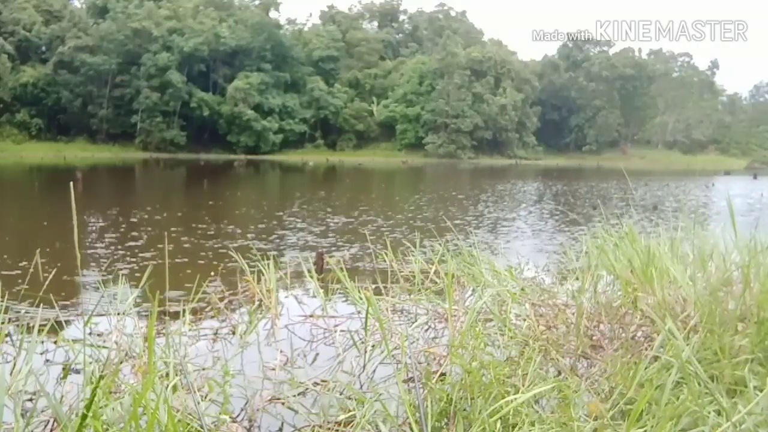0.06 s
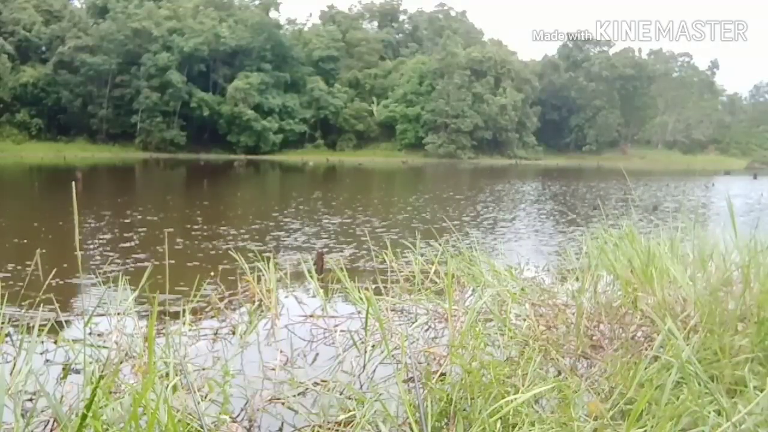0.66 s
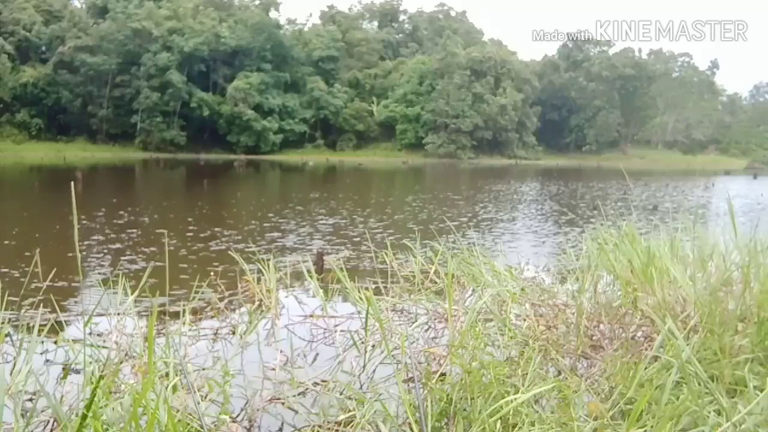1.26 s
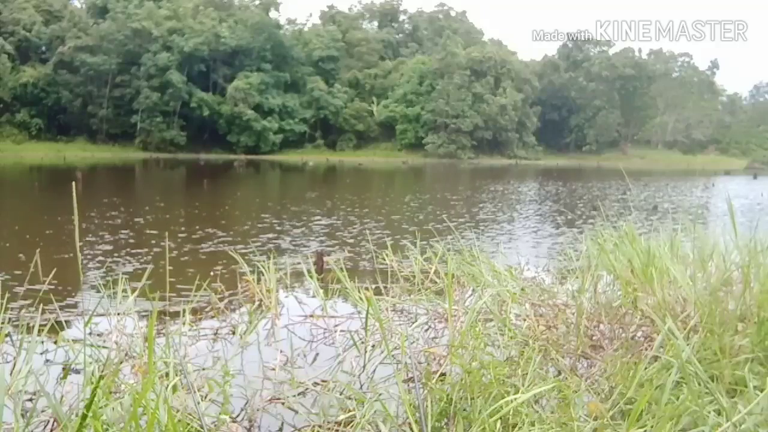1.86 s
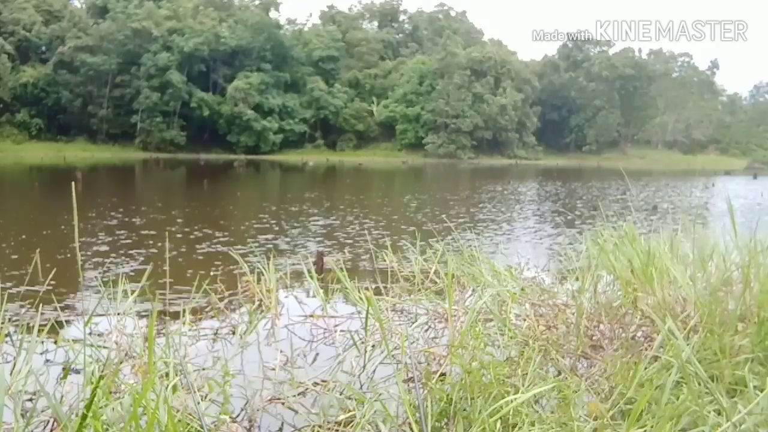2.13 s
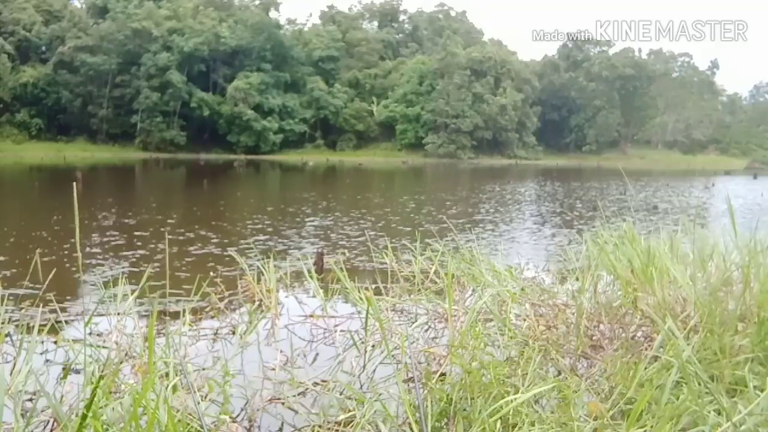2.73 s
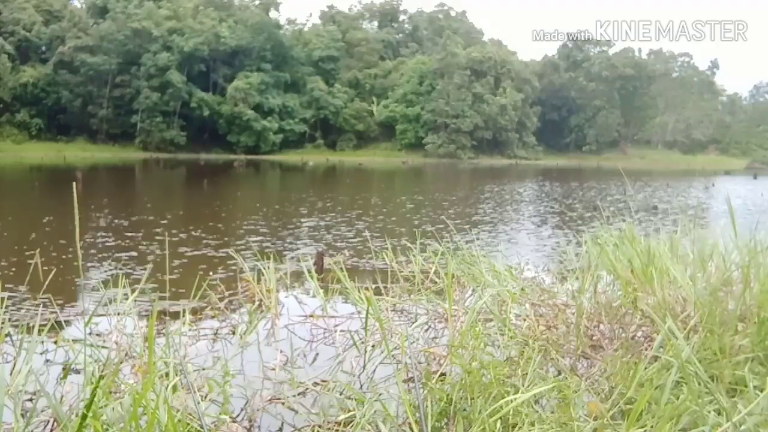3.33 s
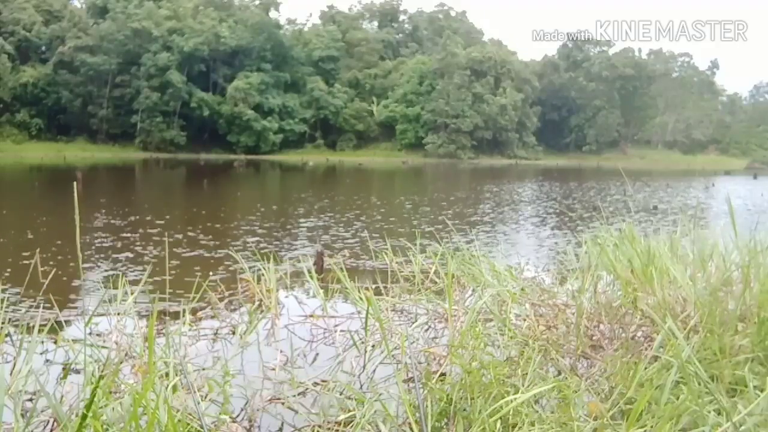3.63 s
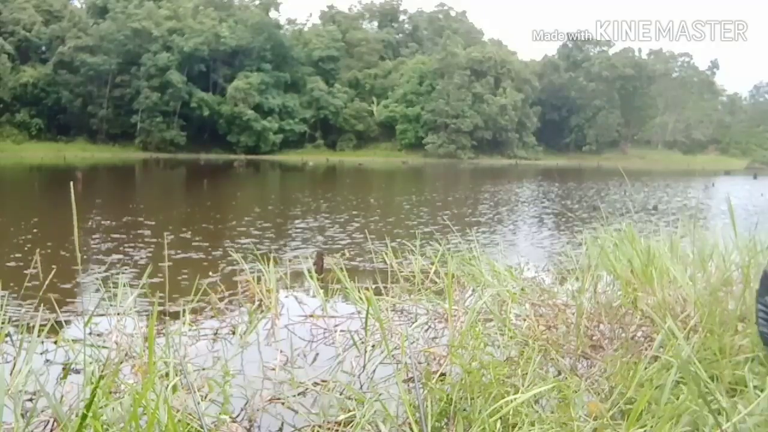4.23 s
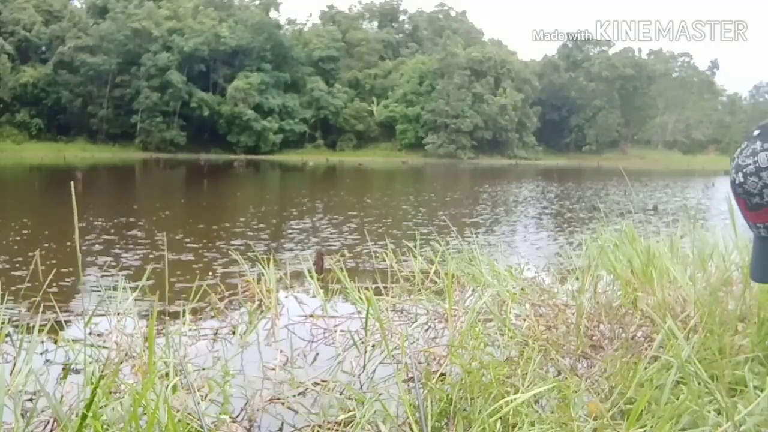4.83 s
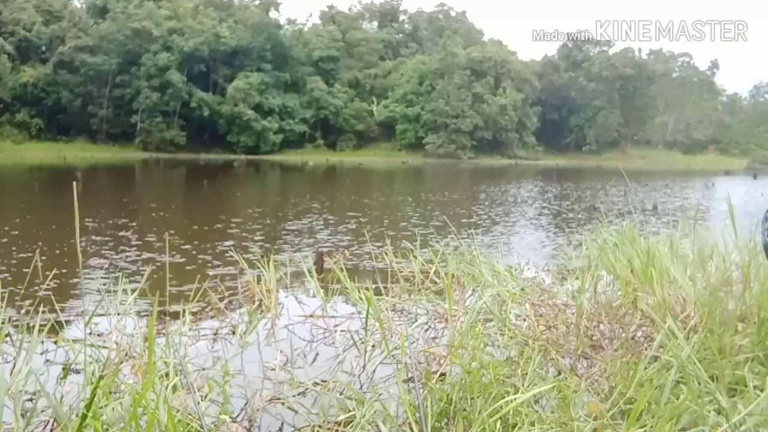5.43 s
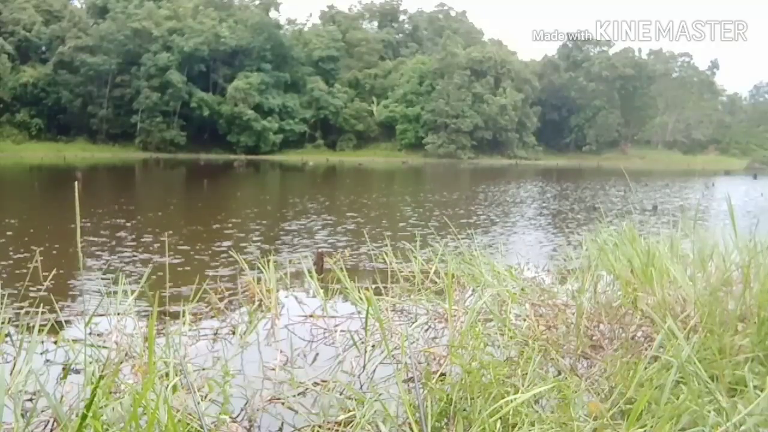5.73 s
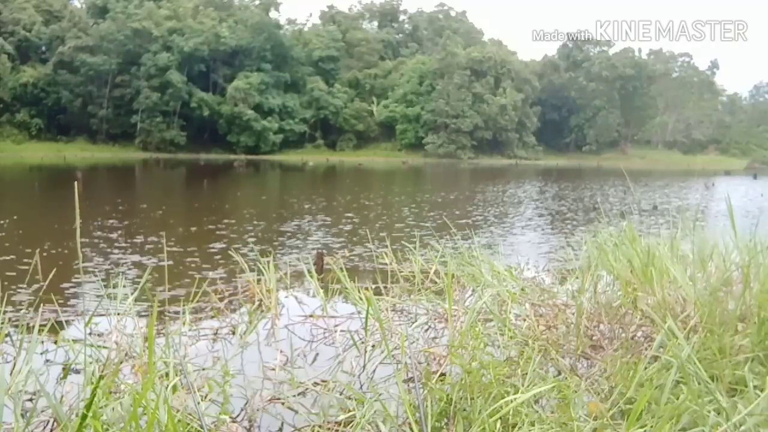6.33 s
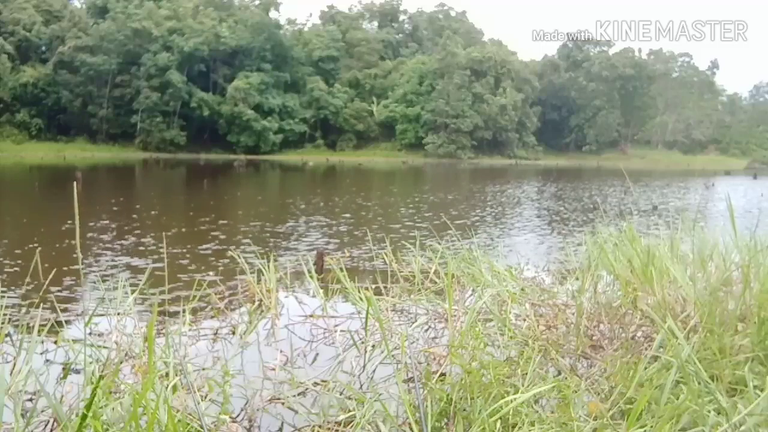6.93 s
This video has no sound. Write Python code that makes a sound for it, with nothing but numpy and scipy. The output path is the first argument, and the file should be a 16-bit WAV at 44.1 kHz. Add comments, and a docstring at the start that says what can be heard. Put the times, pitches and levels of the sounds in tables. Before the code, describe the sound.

A very high insect chirps steadily over a far chorus and birds, while a few steps swish and snap through tall grass midway.

```python
"""A close katydid chirps very high, file on scraper, over a far insect chorus and a light breeze.
Birds whistle, chatter and scold in the trees of a swamp; one pipes a run of rising notes near the end.
Midway someone takes a few steps through tall grass on the bank: blades rub and swish, litter crunches,
stalks snap, feet thud on soft ground. A few small hollow knocks sound nearby. Almost mono."""
import sys
import numpy as np
from scipy import signal
from scipy.fft import rfft, irfft
from scipy.io import wavfile
from scipy.ndimage import uniform_filter1d

SR = 44100
rng = np.random.default_rng(int(sys.argv[2]) if len(sys.argv) > 2 else 0)


def wav_out(sig):
    """Save sig, one row per channel (or a flat mono array), as 16-bit PCM at SR to the path in sys.argv[1]."""
    wavfile.write(sys.argv[1], SR, np.round(np.clip(np.atleast_2d(sig).T, -1, 1) * 32767).astype(np.int16))


N = 312669
TIME_S = np.arange(N) / SR
FREQ_HZ = np.fft.rfftfreq(N, 1 / SR)

# All table levels are relative.
# near katydid chirps: t/s, length/s
KATYDID_CHIRPS = [(-.02, 0.11), (0.238, .11), (0.591, 0.12), (0.875, .11), (1.201, 0.1), (1.578, 0.1),
                  (1.904, 0.11), (2.16, 0.12), (2.437, 0.076), (2.656, .1), (2.863, 0.11), (3.105, 0.13),
                  (3.342, 0.12), (3.646, 0.12), (3.885, 0.12), (4.162, .1), (4.382, 0.083), (4.592, 0.13),
                  (4.841, 0.14), (5.198, 0.11), (5.449, .11), (5.686, 0.12), (5.938, 0.11), (6.172, 0.12),
                  (6.423, 0.15), (6.678, 0.15), (6.954, .14)]
# wing resonance: f/Hz, level/dB
WING_SPECTRUM = [(8000, -29.5), (13000, -23.5), (14100, -32), (14550, 4), (15000, -5), (15400, 11),
                 (16000, -29)]
# breeze rumble: f/Hz, level/dB
RUMBLE_SPECTRUM = [(20, -47), (45, -13), (85, -1), (140, -1.5), (250, -14.5), (600, -33)]
# open-air hiss: f/Hz, level/dB
HISS_SPECTRUM = [(60, -18.5), (220, 1.5), (500, -1.5), (1050, -4.5), (1250, -1.5), (1550, -8.5), (2700, -5),
                 (3500, -3), (5700, -4.5), (10500, -13.5), (15500, -19.5)]
# far insect kinds: f/Hz, half bandwidth/Hz, level/dB, pulse rate/Hz
INSECT_BANDS = [(6315, 140, -73.5, 45), (6978, 290, -66, 23), (7510, 370, -67, 24), (8400, 990, -74.5, 6.4),
                (9250, 400, -75, 19)]
# slurred bird whistles: t/s, length/s, f/Hz, slur/oct, level/dB
WHISTLE_NOTES = [(-.01, 0.049, 3520, 0.0088, -59.5), (1.54, 0.03, 5640, -.14, -62),
                 (1.654, .11, 5250, .04, -58), (2.186, 0.044, 2040, -0.32, -65),
                 (2.289, 0.037, 5150, -0.28, -60), (4.58, 0.092, 1935, 0.35, -67),
                 (4.604, 0.035, 5590, -0.43, -58.5), (4.661, 0.052, 1427, 0.51, -69),
                 (4.78, .04, 4300, 0.0067, -62), (4.803, 0.068, 1460, -0.78, -69),
                 (5.413, 0.075, 4700, -0.015, -67.5), (5.49, .038, 1880, 0.19, -66),
                 (5.555, 0.061, 1384, 0.69, -69), (5.697, .13, 5080, -0.16, -69),
                 (5.805, 0.039, 1780, -0.41, -64), (5.844, .05, 4300, .05, -71),
                 (5.943, .044, 1465, -0.39, -67.5), (5.998, 0.056, 1810, -0.304, -62.5),
                 (6.202, 0.0565, 1700, .38, -63.5), (6.264, 0.032, 2256, -0.016, -64.5),
                 (6.465, .083, 1856, -0.14, -64.5), (6.538, 0.06, 1424, 0.68, -69.5),
                 (6.805, 0.035, 3040, 0.31, -62.5), (6.818, 0.047, 1480, -0.75, -65),
                 (6.872, 0.056, 5000, 0.018, -69), (7.01, 0.038, 1795, -0.35, -67)]
# far bird chatter: start/s, end/s, low f/Hz, high f/Hz, level/dB
FAR_FLOCKS = [(0, 2.7, 4200, 5900, -74), (0, 2.3, 1600, 2400, -85.5), (3.602, 5.6, 1455, 2450, -72.5),
              (4.398, 8.1, 3100, 6600, -84)]
# harsh bird notes: t/s, length/s, low f/Hz, level/dB
SCOLD_NOTES = [(0.092, 0.12, 3966, -57.5), (0.306, 0.095, 3850, -56.5), (.522, 0.12, 3570, -59),
               (0.731, 0.084, 3505, -56.5), (0.959, .1, 3140, -57.5), (1.166, .11, 3120, -57),
               (1.355, 0.14, 3130, -58), (1.626, 0.12, 2903, -62.5), (1.867, .082, 2967, -59.5),
               (2.076, .078, 3150, -59), (2.331, .065, 2690, -64.5), (2.556, 0.035, 2560, -69)]
# hollow knocks: t/s, peak level/dB, pitch ratio
KNOCK_HITS = [(.7395, -40.5, 1.06), (1.665, -58.5, 0.75), (1.869, -57.5, 1), (2.69, -36, 1.08),
              (3.15, -33.5, 0.87), (3.277, -46.5, 1), (3.451, -35.5, 1.12), (6.308, -55, 0.69),
              (6.414, -54.5, .66)]
# knock modes at pitch ratio 1: f/Hz, level/dB, t60/s
KNOCK_MODES = [(730, -9, 0.058), (810, 1.5, 0.055), (1000, 1.5, 0.064), (1231, 11.5, 0.038),
               (1330, 3.5, 0.028), (2165, -3.5, 0.096)]
# breaking stalks: t/s, peak level/dB, f/Hz, width/oct
STALK_SNAPS = [(1.872, -53, 8400, 0.16), (2.691, -37, 5440, .62), (2.862, -32, 6000, .55),
               (3.506, -27, 5760, .37), (3.519, -19, 6300, 0.5), (3.186, -35, 6500, .5),
               (3.9441, -26.5, 5460, 0.9), (3.967, -29, 7100, 0.16), (4.062, -27, 6840, 0.29),
               (4.124, -29, 7500, 0.25), (4.298, -31, 5100, 0.22), (5.2545, -21, 4470, 0.7),
               (5.372, -43, 4950, 0.3), (6.093, -47, 8680, 0.2)]
# footfalls and weight shifts: full-weight t/s, blade level/dB, litter level/dB, blade fade/(dB/s)
FOOTFALLS = [(2.689, -37.5, -45.5, 97), (2.935, -43, -51.5, 108), (3.15, -40.5, -48.5, 77),
             (3.503, -36.5, -43, 114), (3.65, -48.5, -61, 141), (3.946, -39.5, -44.5, 233),
             (4.058, -44, -50.5, 78), (4.36, -39, -51, 202)]
# legs sweeping the blades: t/s, hold/s, level/dB
LEG_SWEEPS = [(2.861, 0.023, -44), (3.012, 0.037, -51.5), (3.368, 0.09, -54), (3.78, 0.14, -51.5),
              (4.197, 0.22, -54), (4.863, .13, -54), (5.001, .3, -47)]
# rubbing blades: f/Hz, level/dB
BLADE_SPECTRUM = [(700, -26), (1250, -15), (1800, -15.5), (2600, -15), (3400, -10), (4700, -9.5),
                  (6050, -7.5), (6550, -8.5), (7050, -4), (7700, 0), (8700, -10), (10500, -10.5),
                  (13000, -14), (15500, -4.5)]
# crushed litter: f/Hz, level/dB
LITTER_SPECTRUM = [(50, -52), (110, -5.5), (200, -4), (400, -2.5), (650, -1), (900, 0), (1080, -2),
                   (1280, 1), (1650, -5), (3000, -3.5), (7000, -19.5)]
# feet on soft ground: t/s, level/dB, f/Hz, t60/s
GROUND_THUDS = [(2.727, -38, 163, 0.047), (3.14, -55, 143, 0.089), (3.5, -41, 130, 0.048),
                (3.505, -56, 243, .21), (3.52, -42.5, 152, .076), (3.929, -48, 219, 0.17),
                (4.196, -57, 126, 0.15), (4.273, -53, 103, 0.2), (4.539, -54, 83, .065),
                (4.973, -55, 91, 0.062), (6.056, -44.5, 98, 0.071)]
# piping bird, note by note: level/dB
PIPE_LEVELS_DB = [-58.5, -60, -59, -65, -66.5, -64, -61.5, -62, -71]
# stereo side relative to mid: f/Hz, level/dB
SIDE_SPECTRUM = [(30, -17), (100, -19), (300, -18), (1200, -21), (2500, -27), (4500, -39), (6500, -50),
                 (11000, -48), (15000, -28)]
# housing resonances: f/Hz, width/Hz, gain/dB
HOUSING_MODES = [(241, 18, -1), (409, 17, 2.5), (872, 24, 1.5), (1236, 38, 9), (3810, 100, 3),
                 (4602, 45, 8), (5040, 17, 7.5), (5350, 18, 3), (5610, 82, 3), (5940, 110, 7.5),
                 (7110, 200, 4), (7500, 69, 3.5)]


def amp(db):
    """Decibels to gain."""
    return 10 ** (np.asarray(db) / 20)


def unit_rms(x):
    """Scale to rms 1."""
    return x / np.sqrt(np.mean(x ** 2) + 1e-20)


def colour(x, spectrum):
    """Filter by (f/Hz, level/dB) points."""
    hz, db = np.transpose(spectrum)
    return irfft(rfft(x) * amp(np.interp(np.log(FREQ_HZ + 1), np.log(hz), db)), N)


def wander(rate_hz, size=N):
    """Slow random curve, about unit spread."""
    knots = rng.standard_normal(4096)
    return 1.2 * np.interp(np.arange(size) * rate_hz / SR, np.arange(len(knots)), knots)


def add(mix, at_s, sound):
    """Mix a sound in, cropped to fit."""
    start = round(at_s * SR)
    sound = sound[max(-start, 0):]
    part = mix[max(start, 0):][:len(sound)]
    part += sound[:len(part)]


def clicks(rate_hz, spread_db):
    """Random impulses of uneven size."""
    size = amp(spread_db * np.minimum(rng.exponential(1, N), 4))
    return unit_rms(size * rng.choice([-1., 1.], N) * (rng.random(N) < rate_hz / SR))


def foliage_echo(x, t60_s, wet_db):
    """Direct sound plus diffuse scatter from leaves and stems."""
    t = TIME_S[:SR]
    tail = rng.standard_normal(SR) * amp(-60 * t / t60_s) * (1 - np.exp(-t / 0.00077))
    return x + amp(wet_db) * signal.fftconvolve(x, tail / np.linalg.norm(tail))[:N]


def wing_force(length_s, stroke_hz=36, floor=0.5, onset_db=-5):
    """One chirp of several wing strokes, the first weakest."""
    t = TIME_S[:int(length_s * SR)]
    strokes = floor + np.sin(np.pi * stroke_hz * t) ** 2
    warm_up = amp(onset_db * np.exp(-t * stroke_hz))
    return unit_rms(strokes * warm_up * signal.windows.tukey(len(t), .3))


def katydids(near_db=-52.5, far_db=-80, far_period_s=.29, far_count=25):
    """A file drags over a scraper; tooth clicks ring the wing. A far katydid keeps its own loose pace."""
    force = np.zeros(N)
    for at_s, length_s in KATYDID_CHIRPS:
        add(force, at_s, amp(near_db) * wing_force(length_s))
    for k, lag in enumerate(rng.random(far_count)):
        add(force, (k + lag / 2) * far_period_s, amp(far_db) * wing_force(length_s=0.11))
    teeth = unit_rms(colour(clicks(rate_hz=7000, spread_db=1.5), WING_SPECTRUM))
    return foliage_echo(force * teeth, t60_s=0.16, wet_db=-9)


def breeze(rumble_db=-76, growth_db_per_s=0.26, hiss_db=-72, swell_db=1.75):
    """Slowly freshening wind rumble and faint open-air hiss."""
    rumble = unit_rms(colour(rng.standard_normal(N), RUMBLE_SPECTRUM))
    hiss_gain = amp(hiss_db + swell_db * wander(7.9))
    hiss = unit_rms(colour(rng.standard_normal(N), HISS_SPECTRUM))
    return amp(rumble_db + growth_db_per_s * TIME_S) * rumble + hiss_gain * hiss


def insect_chorus(pulse_depth=0.21, flutter_db=0.73):
    """Far insects of each kind blur into one pulsing band."""
    out = np.zeros(N)
    for hz, half_width_hz, db, pulse_hz in INSECT_BANDS:
        band = irfft(rfft(rng.standard_normal(N)) / (1 + ((FREQ_HZ - hz) / half_width_hz) ** 6), N)
        pulse = np.sin(2 * np.pi * np.cumsum(pulse_hz * (1 + 0.27 * wander(8))) / SR)
        out += amp(db + flutter_db * wander(30)) * unit_rms(band) * (1 + pulse_depth * pulse)
    return out


def flicker(x, depth_db):
    """Narrow bands swell and fade at random, a few hundredths of a second each."""
    frames = signal.stft(x, nperseg=512)[2]
    patches = uniform_filter1d(rng.standard_normal(frames.shape), size=4, axis=1)
    patches = unit_rms(uniform_filter1d(patches, size=2, axis=0))
    return signal.istft(frames * unit_rms(amp(depth_db * patches)), nperseg=512)[1][:N]


def glide(length_s, path_hz, roughness, turn=0.499):
    """Phase and envelope of a bird note: starts clean, roughens as it bends through three pitches."""
    progress = np.linspace(0, 1, int(length_s * SR))
    hz = np.interp(progress, [0, turn, 1], path_hz)
    jitter = roughness * np.minimum(2 * progress, 1) * wander(900, len(hz))
    return 2 * np.pi * np.cumsum(hz * (1 + jitter)) / SR, signal.windows.tukey(len(hz), .4)


def whistle(length_s, path_hz, roughness, waver_db=2.5):
    """One gliding note of wavering level."""
    phase, envelope = glide(length_s, path_hz, roughness)
    return envelope * unit_rms(amp(waver_db * wander(144, len(phase)))) * np.sin(phase)


def whistling_birds(gain_db=-1.5):
    """Up- and downslurs from across the water, echoed by the trees."""
    out = np.zeros(N)
    for at_s, length_s, hz, slur_oct, db in WHISTLE_NOTES:
        path_hz = hz * 2 ** (slur_oct * np.array([-.5, 0, .5]))
        add(out, at_s, amp(db + gain_db) * whistle(length_s, path_hz, roughness=.032))
    return foliage_echo(out, t60_s=.5, wet_db=-.5)


def far_birds(count=50):
    """Short random slurs deep in the trees blend into soft chatter."""
    out = np.zeros(N)
    for start_s, end_s, low_hz, high_hz, db in FAR_FLOCKS:
        for k, (lag, pitch, bend, length, size) in enumerate(rng.random((count, 5))):
            hz = low_hz * (high_hz / low_hz) ** pitch
            slur = 0.249 * (bend - .5)
            path_hz = hz * (1 - slur), hz, hz * (1 + slur)
            phase, envelope = glide(.02 + .03 * length, path_hz, roughness=.04)
            at_s = start_s + (end_s - start_s) * (k + lag) / count
            add(out, at_s, amp(db) * (.5 + size) * envelope * np.sin(phase))
    return foliage_echo(out, t60_s=.6, wet_db=3)


def scolding_bird(gain_db=-0.4, turn_s=.03, dive_from_s=1.5, dive_hz=4200, upper_db=-8, upper_ratio=1.47):
    """Rasping, swelling upslurs with a weaker upper voice; later notes dive in first and are rougher."""
    out = np.zeros(N)
    for at_s, length_s, low_hz, db in SCOLD_NOTES:
        start_hz = dive_hz if at_s > dive_from_s else low_hz
        end_hz = low_hz + .66 * (4850 - low_hz)  # two thirds of the way to 4850 Hz
        roughness = 0.031 + 0.015 * at_s
        turn = min(turn_s / length_s, 1)
        phase, envelope = glide(length_s, (start_hz, low_hz, end_hz), roughness, turn)
        upper_hz = upper_ratio * start_hz, upper_ratio * low_hz, 1.16 * end_hz
        upper_phase, _ = glide(length_s, upper_hz, roughness, turn)
        voices = np.sin(phase) + amp(upper_db) * np.sin(upper_phase)
        swell_db = np.linspace(-5, 0, len(phase))
        rasp = unit_rms(amp(3 * wander(260, len(phase)) + swell_db))
        add(out, at_s, amp(db + gain_db) * envelope * rasp * voices)
    return foliage_echo(out, t60_s=.42, wet_db=0)


def knocks():
    """Light taps ring short, hollow modes."""
    out, t = np.zeros(N), TIME_S[:SR // 5]
    for at_s, db, ratio in KNOCK_HITS:
        ring = sum(amp(mode_db - 60 * t / t60_s) * np.sin(2 * np.pi * hz * ratio * t)
                   for hz, mode_db, t60_s in KNOCK_MODES)
        add(out, at_s, amp(db) * ring / abs(ring).max())
    return out


def crack(centre_hz, width_oct, t60_s, highpass_hz=1300):
    """Millisecond burst pitched by stalk thickness; it carries no bass."""
    t = TIME_S[:4096]
    hz = np.fft.rfftfreq(len(t), 1 / SR) + 1
    resonance = 1 / (1 + (np.log2(hz / centre_hz) / width_oct) ** 2 / 2) ** 2
    burst = irfft(resonance * np.exp(2j * np.pi * rng.random(len(hz)))) * amp(-60 * t / t60_s)
    burst = signal.sosfilt(signal.butter(3, highpass_hz, "high", fs=SR, output="sos"), burst)
    return burst / abs(burst).max()


def stalk_snaps(splinter_at_s=4.353, splinter_length_s=.035, fibres=7, fibre_db=-25, spread_db=2):
    """Most stalks break in one crack; a tough one splinters fibre by fibre."""
    out = np.zeros(N)
    for at_s, db, centre_hz, width_oct in STALK_SNAPS:
        add(out, at_s, amp(db) * crack(centre_hz, width_oct, t60_s=0.021))
    for k, (lag, size) in enumerate(rng.random((fibres, 2))):
        gain = amp(fibre_db + spread_db * (2 * size - 1))
        at_s = splinter_at_s + splinter_length_s * (k + lag) / fibres
        add(out, at_s, gain * crack(centre_hz=5280, width_oct=0.19, t60_s=0.0039))
    return foliage_echo(out, t60_s=.08, wet_db=-12)


def push(at_s, hold_s, rise_s, fade_db_per_s):
    """Load on the grass: builds until at_s, holds, fades."""
    build = np.exp(np.minimum(TIME_S - at_s, 0) / rise_s)
    return build * amp(-fade_db_per_s * np.maximum(TIME_S - at_s - hold_s, 0))


def footfall(at_s, fade_db_per_s, heel_lead_s=0.037, heel_db=-9.5, rise_s=0.013):
    """Light heel contact, then full weight."""
    heel = amp(heel_db) * push(at_s - heel_lead_s, 0, rise_s, fade_db_per_s)
    return np.maximum(heel, push(at_s, 0, rise_s, fade_db_per_s))


def walk(sweep_litter_db=-22.5, litter_fade_ratio=1.12):
    """Blade and litter envelopes; leg sweeps and footfalls add in power."""
    brush_power = sum((amp(db) * push(at_s, hold_s, rise_s=0.014, fade_db_per_s=101)) ** 2
                      for at_s, hold_s, db in LEG_SWEEPS)
    crush_power = brush_power * amp(sweep_litter_db) ** 2
    for at_s, blade_db, litter_db, fade_db_per_s in FOOTFALLS:
        brush_power += (amp(blade_db) * footfall(at_s, fade_db_per_s)) ** 2
        crush_power += (amp(litter_db) * footfall(at_s, fade_db_per_s * litter_fade_ratio)) ** 2
    return np.sqrt(brush_power), np.sqrt(crush_power)


def blade_ring(drive, low_hz=1200, high_hz=10000, width_hz=220, rub_db=3.5, count=44):
    """Each click rings one blade; each blade has its own pitch and moments of rubbing."""
    out, blade = np.zeros(N), rng.integers(0, count, N)
    radius = np.exp(-np.pi * width_hz / SR)
    for k, hz in enumerate(np.linspace(low_hz, high_hz, count)):
        rubbing = amp(rub_db * wander(55))
        resonator = [1, -2 * radius * np.cos(2 * np.pi * hz / SR), radius ** 2]
        out += signal.lfilter([1, 0, -1], resonator, drive * rubbing * (blade == k))
    return unit_rms(out)


def grass(clump_db=1.05, firm_db=-44, tick_db=-10):
    """Blades slip in clumps of fine clicks and dry ticks; litter breaks in coarser, duller ones."""
    clumps = amp(clump_db * wander(170))
    brush, crush = walk()
    ringing = blade_ring(clicks(rate_hz=9000, spread_db=3.5))
    scrape = (brush / amp(firm_db)) ** 0.3  # firmer push, brighter scrape
    rubbed = (ringing + scrape * clicks(rate_hz=3000, spread_db=2)) / np.sqrt(1 + scrape ** 2 / 2)
    ticks = amp(tick_db) * clicks(rate_hz=130, spread_db=2.5)
    swish = unit_rms(colour(clumps * (rubbed + ticks), BLADE_SPECTRUM))
    crunch = unit_rms(colour(clumps * clicks(rate_hz=2000, spread_db=1), LITTER_SPECTRUM))
    return swish * brush + crunch * crush


def thuds(rise_s=0.0032, highpass_hz=65):
    """A foot's weight gives soft ground a dull, uneven push."""
    out, t = np.zeros(N), TIME_S[:SR // 4]
    for at_s, db, hz, t60_s in GROUND_THUDS:
        phase = 2 * np.pi * np.cumsum(hz * (1 + 0.2 * wander(153, len(t)))) / SR
        envelope = amp(db - 60 * t / t60_s) * (1 - np.exp(-t / rise_s))
        add(out, at_s, envelope * np.sin(phase))
    return signal.sosfilt(signal.butter(4, highpass_hz, "high", fs=SR, output="sos"), out)


def piping_bird(start_s=5.468, period_s=.1465, length_s=0.077, path_hz=(3200, 3370, 3680), fade_db=-9):
    """One short upslur repeated at an even pace, each note fading as it rises."""
    out = np.zeros(N)
    for k, db in enumerate(PIPE_LEVELS_DB):
        detune = 1 + 0.0248 * rng.uniform(-1.01, 1)
        note = whistle(length_s, np.array(path_hz) * detune, roughness=0.041)
        add(out, start_s + k * period_s, amp(db + np.linspace(0, fade_db, len(note))) * note)
    return foliage_echo(out, t60_s=.5, wet_db=-1)


def scene(gain_db=-1):
    """All sources centred; slight width, mainly in the lows."""
    birds = scolding_bird() + piping_bird() + whistling_birds() + far_birds()
    bed = flicker(breeze() + insect_chorus(), depth_db=3)
    steps = flicker(grass(), depth_db=2) + stalk_snaps() + knocks() + thuds()
    mid = amp(gain_db) * (bed + katydids() + birds + steps)
    diffuser = irfft(np.exp(2j * np.pi * rng.random(513)))
    side = colour(signal.fftconvolve(mid, diffuser)[:N], SIDE_SPECTRUM)
    return np.array([mid + side, mid - side])


def record(dry, cutoff_hz=15560):
    """The housing around the microphone rings faintly; a steep low-pass follows."""
    housing = 1 + sum((amp(db) - 1) / (1 + 2j * (FREQ_HZ - hz) / width_hz)
                      for hz, width_hz, db in HOUSING_MODES)
    coloured = irfft(rfft(dry) * housing, N)
    lowpass = signal.firwin(801, cutoff_hz, window=("kaiser", 8), fs=SR)
    return signal.oaconvolve(coloured, lowpass[None], "same")


dry = scene()
out = record(dry)
wav_out(out)
```